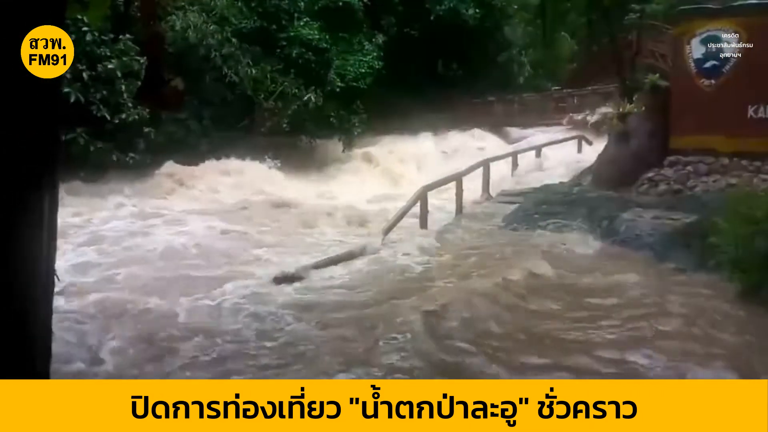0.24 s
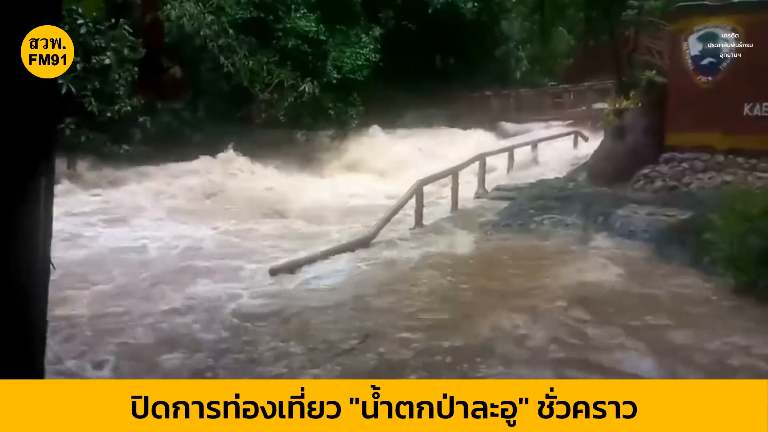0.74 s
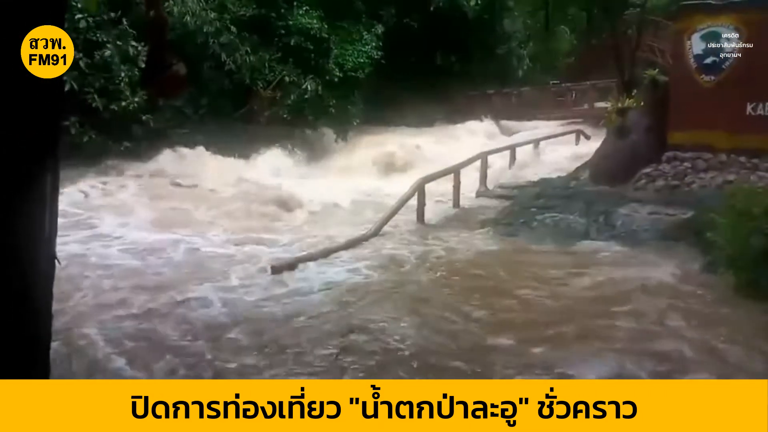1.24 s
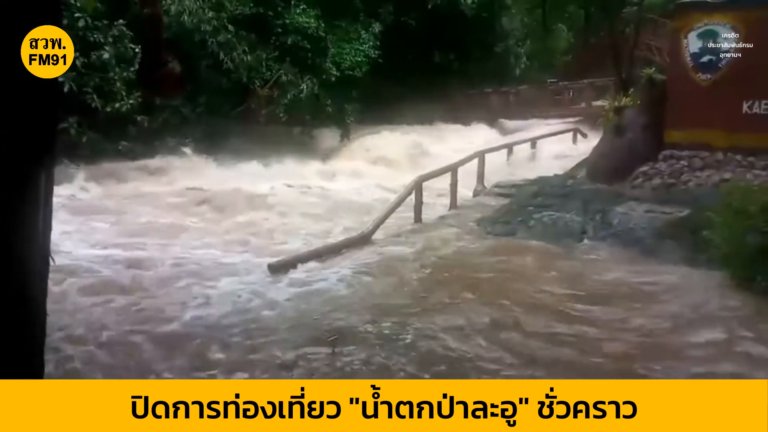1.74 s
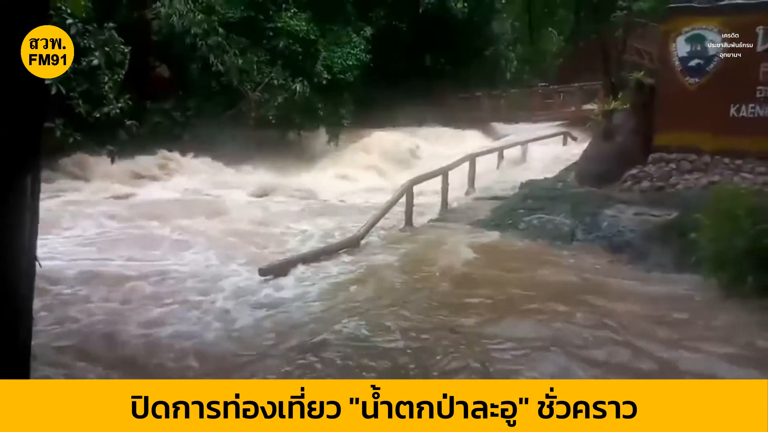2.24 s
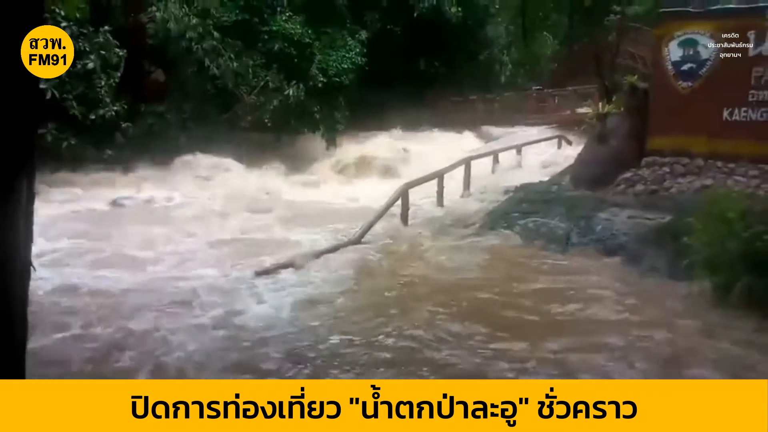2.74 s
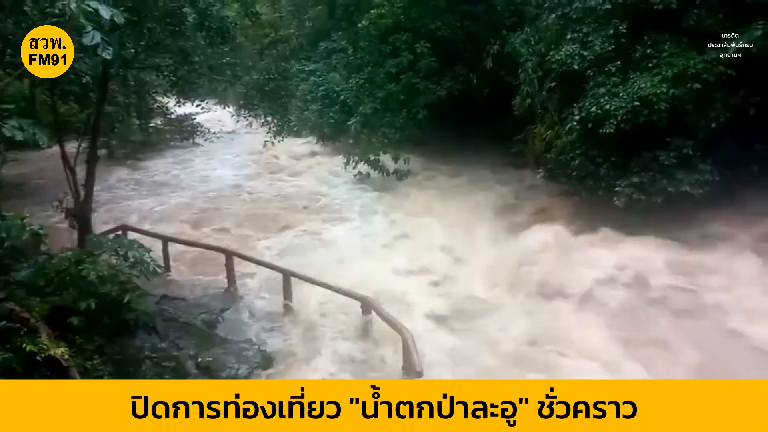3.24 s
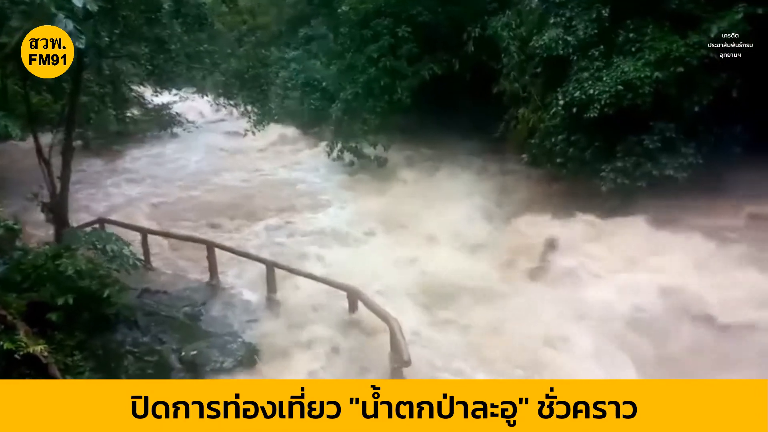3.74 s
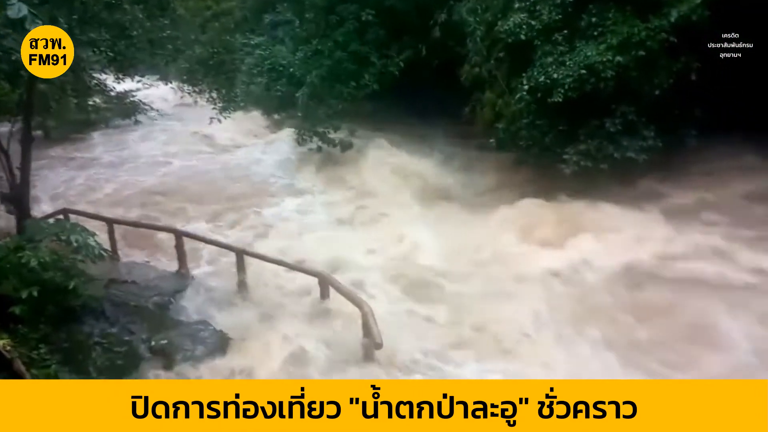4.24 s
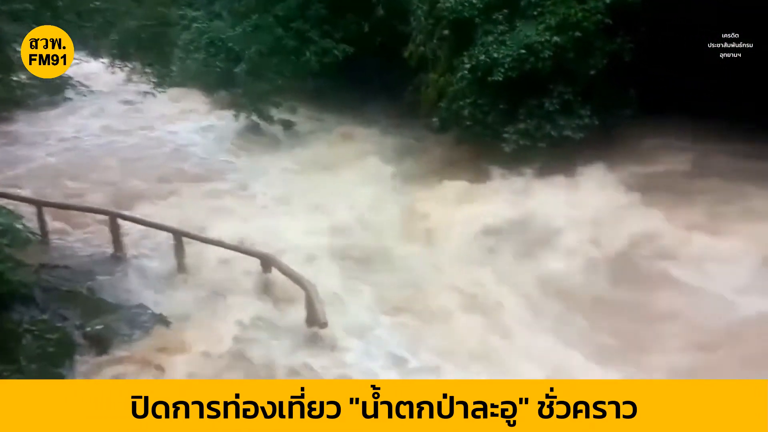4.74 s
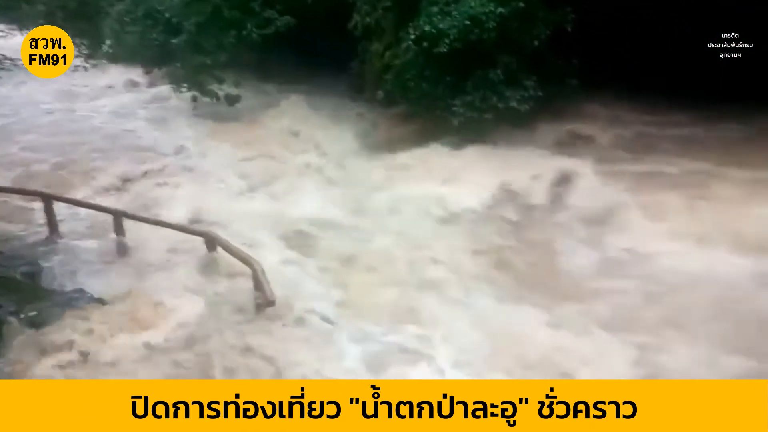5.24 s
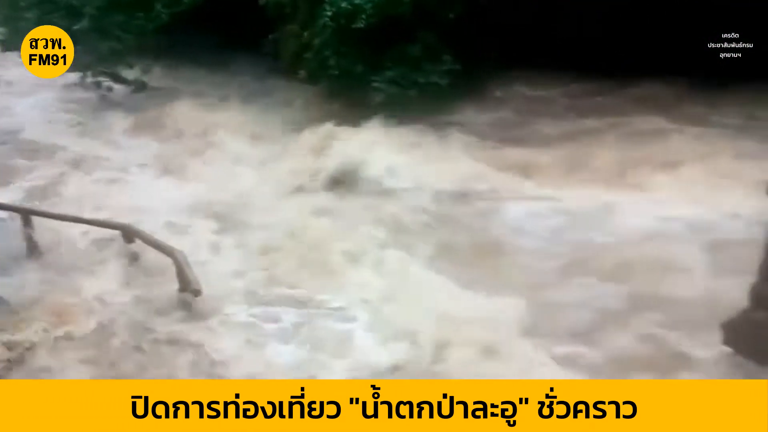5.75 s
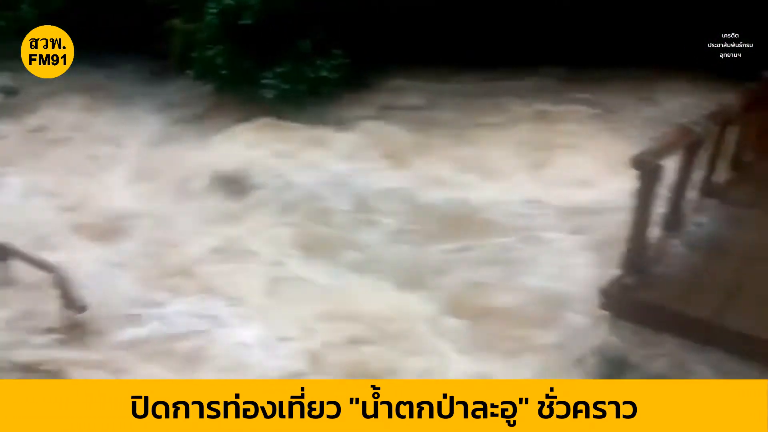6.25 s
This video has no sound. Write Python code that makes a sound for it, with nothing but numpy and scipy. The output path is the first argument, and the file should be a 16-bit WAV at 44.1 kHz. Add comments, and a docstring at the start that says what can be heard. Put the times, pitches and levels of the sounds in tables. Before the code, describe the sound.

Floodwater rushes steadily over rocks with a deep rumble and hissing spray, cuts out for half a second, then fades back in.

```python
"""Flooded forest stream over rocks.

Plunging water rumbles under a wash of foam, a mass of small ringing bubbles and the hiss of spray.
Mono, from two places on the bank: the sound stops dead beside the fall, then fades in above the rapids.
Now and then the rush warbles: it turns briefly glassy and its treble dips."""
import sys
import numpy as np
from scipy import signal
from scipy.fft import rfft, irfft
from scipy.io import wavfile
from scipy.ndimage import uniform_filter1d, map_coordinates

SR = 44100
rng = np.random.default_rng(int(sys.argv[2]) if len(sys.argv) > 2 else 0)


def wav_record(signal):
    """Record a signal, one row per channel, as 16-bit PCM in the file named by sys.argv[1]."""
    frames = np.transpose(np.atleast_2d(signal))
    bounded = np.clip(frames, -1, 1)
    # unit amplitude maps onto the largest positive 16-bit level
    quanta = np.round(bounded * 32767).astype(np.int16)
    wavfile.write(sys.argv[1], SR, quanta)


N = 286209
TIME_S = np.arange(N) / SR

# Spectra of the churning water. Each row: frequency in Hz, relative spectral density in dB.
FALL_ROAR_SPECTRUM = [(15, -57), (25, -30.5), (37, -24), (56, -19.5), (89, -1), (114, -1.5), (182, 0),
                      (267, -4.5), (365, -6.5), (596, -13.5), (779, -11.5), (953, -12), (2080, -10),
                      (2850, -10.5), (5200, -14.5), (6760, -42), (11400, -120)]
RAPIDS_ROAR_SPECTRUM = [(15, -62), (25, -32), (32, -31), (51, -17), (80, -3), (146, 1.5), (255, 0),
                        (436, -10), (521, -8), (623, -5.5), (1070, -3), (1250, -7.5), (1740, -4.5),
                        (3330, -8), (5200, -10), (6760, -21), (11400, -120)]
# Spectra of the spray. Each row: frequency in Hz, relative spectral density in dB.
FALL_SPRAY_SPECTRUM = [(3500, -37.5), (5200, -9.5), (5900, -2), (6650, 1.5), (7400, -1.5), (8000, -7.5),
                       (9000, -13), (10400, -10.5), (11700, -13), (13000, -17.5), (14100, -20),
                       (14350, -7.5), (15700, -10.5)]
RAPIDS_SPRAY_SPECTRUM = [(3500, -36), (5200, -13), (5900, -5.5), (6650, -0.5), (7400, -3.5), (8000, -10),
                         (9000, -16), (10400, -18.5), (11700, -21.5), (13000, -23.5), (14100, -26),
                         (14350, -14), (15700, -13.5)]
# Longer glassy moments. Each row: centre in seconds, length in seconds.
LONG_WARBLES = [(0.098, 0.058), (0.55, 0.036), (3.777, 0.12), (4.937, 0.046)]


def gain(db):
    """Decibels to amplitude."""
    return 10 ** (np.asarray(db) / 20)


def unit_rms(x):
    """Scale to an rms of one."""
    return x / np.sqrt(np.mean(x ** 2) + 1e-20)


def coloured(x, spectrum):
    """Filter by a dB curve interpolated over log frequency; unit rms out."""
    hz, db = np.transpose(spectrum)
    bins_hz = np.fft.rfftfreq(2 * N, 1 / SR)
    curve_db = np.interp(np.log(bins_hz + 1), np.log(hz), db)
    return unit_rms(irfft(rfft(x, 2 * N) * gain(curve_db))[:N])


def churn(patch_db, crest_db):
    """Noise of countless bubbles: clouds swell in patches of time and pitch, whole crests flicker."""
    framing = dict(fs=SR, nperseg=512, noverlap=384)
    _, frames_s, noise = signal.stft(rng.standard_normal(N), **framing)
    patches = uniform_filter1d(rng.standard_normal(noise.shape), size=22, axis=1)
    patches = unit_rms(uniform_filter1d(patches, size=5, axis=0))
    crests = unit_rms(uniform_filter1d(rng.standard_normal(len(frames_s)), size=8))
    foam = noise * gain(patch_db * patches + crest_db * crests)
    return unit_rms(signal.istft(foam, **framing)[1][:N])


def bubbles(low_hz, high_hz, rate_per_s, cycles, rise_fraction, spread_db):
    """Single bubbles ring down and rise in pitch as they near the surface."""
    pitches_hz = np.geomspace(low_hz, high_hz, 36)
    out = np.zeros(N)
    for hz in pitches_hz:
        age = np.linspace(0, 1, int(cycles * SR / hz) + 2)
        phase = 2 * np.pi * cycles * (age + rise_fraction * age ** 2 / 2)
        ring = np.sin(phase) * gain(-40 * age)
        strengths = gain(spread_db * np.minimum(rng.exponential(1, N), 4))
        births = rng.random(N) < rate_per_s / len(pitches_hz) / SR
        out += hz * signal.oaconvolve(strengths * births, ring)[:N]  # equal power per Hz
    return unit_rms(out)


def flow_wander(rms_db=0.26, smooth_s=0.3):
    """Gain of a steady flow: slight, slow, random swells."""
    drift = uniform_filter1d(rng.standard_normal(N), size=int(smooth_s * SR))
    return gain(rms_db * unit_rms(drift))


def torrent(roar_spectrum, spray_spectrum, roar_db, spray_db, gurgle_re_churn_db, splash_re_churn_db):
    """Water at one place: deep churning with gurgles, spray with splashing drops."""
    gurgle = bubbles(247, 4524, rate_per_s=1600, cycles=52, rise_fraction=0.056, spread_db=1.5)
    splash = bubbles(4470, 15000, rate_per_s=2500, cycles=5.8, rise_fraction=0.1, spread_db=2.5)
    roar = churn(patch_db=0.55, crest_db=0.52) + gain(gurgle_re_churn_db) * gurgle
    spray = churn(patch_db=1.0, crest_db=0.26) + gain(splash_re_churn_db) * splash
    roar = gain(roar_db) * coloured(roar, roar_spectrum)
    spray = gain(spray_db) * coloured(spray, spray_spectrum)
    return (roar + spray) * flow_wander()


def glassy(water, band_hz=70, hold_s=0.05, hollow_db=45):
    """Only scattered, shifting bands of the rush ring on; the rumble stays whole."""
    framing = dict(fs=SR, nperseg=2048, noverlap=1536)
    hz, frames_s, rush = signal.stft(water, **framing)
    cells = np.meshgrid(hz / band_hz, frames_s / hold_s, indexing="ij")
    pattern = map_coordinates(rng.standard_normal(rush.shape), cells, order=1)
    hollows = np.clip(0.9 + 3 * pattern, 0, 1)
    band_gain = 1.13 * unit_rms(gain(-hollow_db * hollows))
    above_rumble = np.interp(hz, [250, 380], [0, 1])[:, None]
    return signal.istft(rush * band_gain ** above_rumble, **framing)[1][:N]


def warble(water, moments, edge_s=0.011, base_dip_db=6.5, dip_db_per_s=320.5):
    """At each moment the rush turns glassy and the treble dips, deeper for longer moments."""
    gates = np.array([np.clip((length_s / 2 - abs(TIME_S - centre_s)) / edge_s + 0.5, 0, 1)
                      for centre_s, length_s in moments])
    blend = np.minimum(gates.sum(0), 1)
    wavering = water + blend * (glassy(water) - water)
    treble_fir = signal.firwin(301, [8200, 14500], pass_zero=False, fs=SR)
    top_fir = signal.firwin(301, 14500, pass_zero=False, fs=SR)
    treble = signal.oaconvolve(wavering, treble_fir, "same")
    top = signal.oaconvolve(wavering, top_fir, "same")
    dip_db = (base_dip_db + dip_db_per_s * moments[:, 1]) @ gates
    return wavering - treble * (1 - gain(-dip_db)) - top * (1 - gain(-dip_db / 2))


def flickers(rate_per_s=3.0, mean_length_s=0.018, slots=40):
    """Very brief warbles, one at random per time slot. Each row: centre in seconds, length in seconds."""
    offset, stretch = rng.random((slots, 2)).T
    centres_s = (np.arange(slots) + offset) / rate_per_s
    lengths_s = mean_length_s * (0.75 + 0.5 * stretch)
    return np.column_stack([centres_s, lengths_s])[centres_s < N / SR]


def scene():
    """The fall, half a second of silence, then the rapids fading in."""
    fall = torrent(FALL_ROAR_SPECTRUM, FALL_SPRAY_SPECTRUM, roar_db=-23.0, spray_db=-25.5,
                   gurgle_re_churn_db=-15.5, splash_re_churn_db=-17)
    rapids = torrent(RAPIDS_ROAR_SPECTRUM, RAPIDS_SPRAY_SPECTRUM, roar_db=-23.5, spray_db=-23.0,
                     gurgle_re_churn_db=-12.5, splash_re_churn_db=-17)
    stop_s, tail_s, return_s, fade_in_s = 2.761, 0.03, 3.261, 0.27
    fall_gain = np.interp(TIME_S, [stop_s, stop_s + tail_s], [gain(-28.5), 0], left=1)
    rapids_gain = np.interp(TIME_S, [return_s, return_s + fade_in_s], [0.06, 1], left=0)
    water = fall * fall_gain + rapids * rapids_gain
    water = warble(water, np.vstack([LONG_WARBLES, flickers()]))
    return np.array([water, water])


def record(dry):
    """Steep low-pass."""
    cutoff_hz = 15800
    lowpass_fir = signal.firwin(1023, cutoff_hz, window=("kaiser", 9), fs=SR)
    return signal.oaconvolve(dry, lowpass_fir[None], "same")


dry = scene()
out = record(dry)
wav_record(out)
```